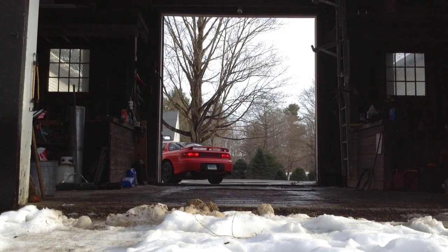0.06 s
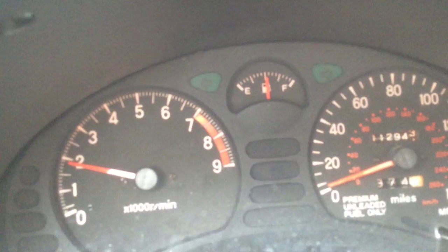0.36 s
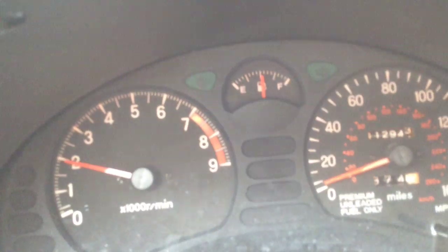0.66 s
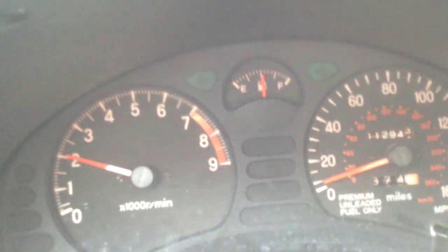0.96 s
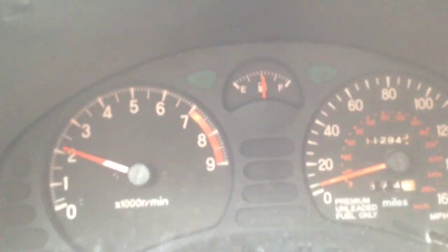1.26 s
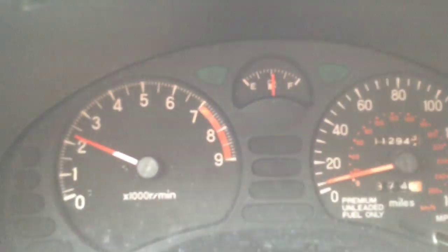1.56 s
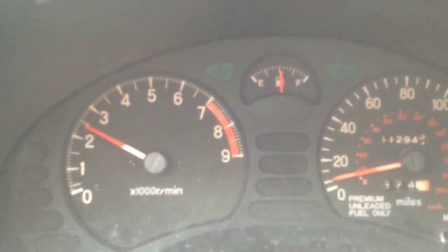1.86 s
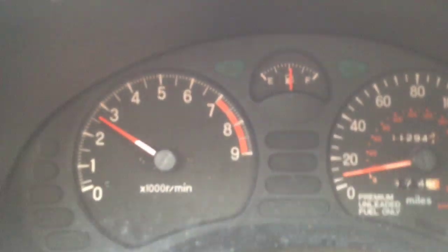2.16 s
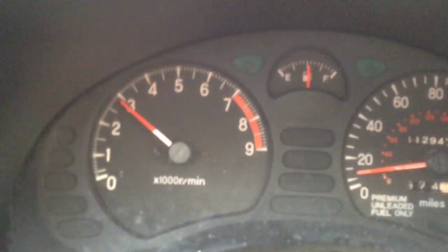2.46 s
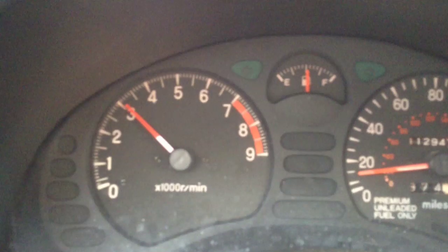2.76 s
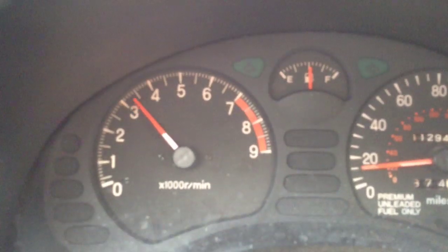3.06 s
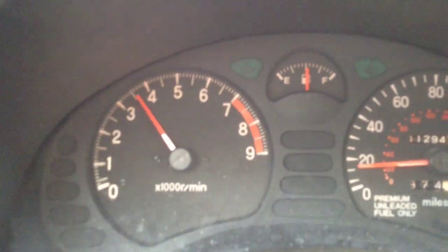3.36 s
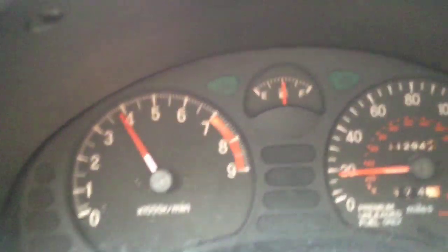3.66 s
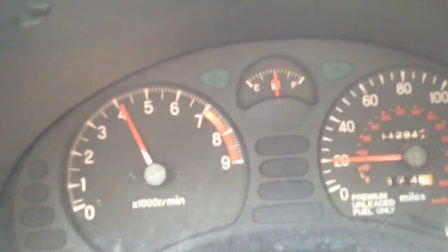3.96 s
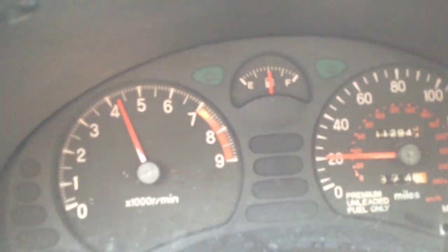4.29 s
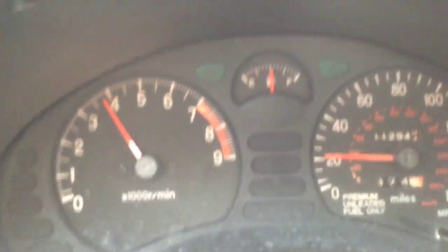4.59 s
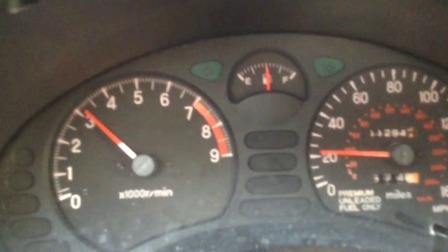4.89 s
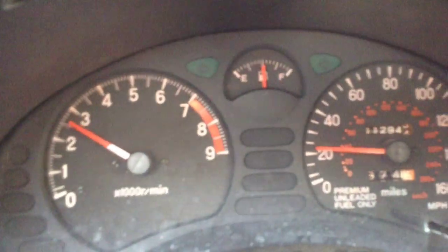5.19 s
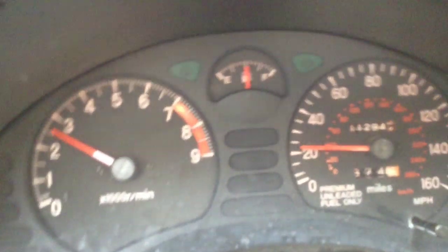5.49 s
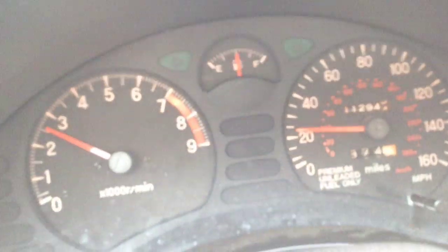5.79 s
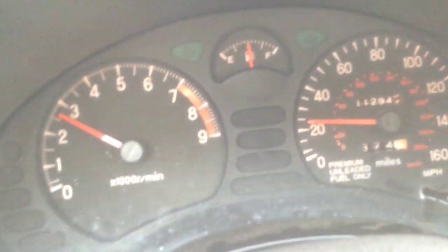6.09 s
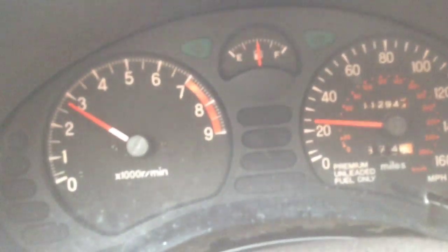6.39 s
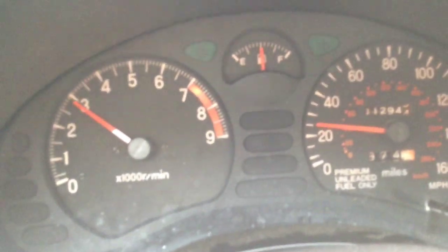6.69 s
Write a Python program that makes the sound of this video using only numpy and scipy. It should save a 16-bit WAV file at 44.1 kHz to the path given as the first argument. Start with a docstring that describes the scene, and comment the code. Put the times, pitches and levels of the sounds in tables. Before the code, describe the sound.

A sports car idles outdoors for a moment with a brief, very high brake squeal. Two clicks switch the sound to the driver's seat, where the engine accelerates steadily, its deep exhaust booming in the cabin over growing road noise. Loose plastic trim ticks and knocks now and then. The engine falls back, burbling, for a gear change, then pulls again with a slowly rising pitch.

```python
"""First a V6 sports car idles outside a barn, over the hiss of a wet yard, and a brake squeals briefly. After a
third of a second the sound jumps, with two clicks, to the driver's seat. The engine pulls from about 2000 to
over 4000 rpm: the exhaust booms in the cabin, gas and road noise rise with it, and loose trim scuffs, ticks and
knocks. At 4.2 s the foot lifts for a gear change and the engine falls back, burbling. The gear lever clunks,
and at 5.4 s second gear bites and it pulls again."""
import sys
import numpy as np
from scipy import signal
from scipy.fft import rfft, irfft, next_fast_len
from scipy.io import wavfile
from scipy.ndimage import uniform_filter1d

SR = 44100
rng = np.random.default_rng(int(sys.argv[2]) if len(sys.argv) > 2 else 0)


def log_audio(samples):
    """Write samples as a 16-bit WAV file to the path given in sys.argv[1]."""
    # one column per channel
    frames = np.atleast_2d(samples).T
    # limit to full scale, then quantise
    limited = np.clip(frames, -1, 1)
    pcm = np.round(limited * 32767).astype(np.int16)
    wavfile.write(sys.argv[1], SR, pcm)


N = 301644
TIME = np.arange(N) / SR
MID_SPEED_HZ = 70

# Engine speed, as how often one bank (a row of three cylinders) fires: t/s, f/Hz
ENGINE_SPEED = [(0.36, 48.7), (0.41, 48.81), (1.09, 53.5), (1.61, 58.2), (2.53, 74.22), (3.47, 93.34),
                (4.05, 106.3), (4.19, 109.0), (4.26, 107.3), (4.35, 101.6), (4.51, 94.1), (4.71, 82.1),
                (4.91, 73.2), (5.18, 59.9), (5.34, 63.6), (5.43, 61.7), (5.57, 63.2), (5.7, 62.95),
                (6.54, 71.4), (6.79, 73.9)]
# The throttle, as the strength of the exhaust pulses: t/s, level/dB
PULSE_STRENGTH = [(.34, -6.5), (.58, -1), (4.2, 0.5), (4.3, -10.5), (4.6, -7.5), (5.08, -8.5), (5.2, -13.5),
                  (5.33, -19), (5.52, 2), (6.84, -2)]
# A faster engine is louder: bank f/Hz, growl level/dB, gas rush level/dB, hiss level/dB
LEVELS_BY_SPEED = [(48.3, -35.5, -48.5, -74), (57.2, -32, -45, -74.5), (65.8, -27, -42, -67.5),
                   (80.6, -24.5, -41.5, -68), (88.8, -25, -40.5, -64.5), (96.8, -24, -36, -58.5),
                   (109, -25.5, -35.5, -54)]
def driving(lift_s=4.2, second_gear_s=5.4, pedal_s=.11, clutch_s=.51, burble=.22, jitter=.00053):
    """Speed, throttle and gear set how loud the exhaust, gas and road are inside the car."""
    bank_hz = uniform_filter1d(in_time(ENGINE_SPEED)[0], SR // 16)   # the flywheel smooths the speed
    throttle_db, = in_time(PULSE_STRENGTH)
    foot_up = ramp(lift_s, pedal_s)
    lift = foot_up - ramp(second_gear_s, pedal_s)
    stumble = burble * (foot_up - ramp(second_gear_s, clutch_s))   # firing steadies as the clutch grips
    labour = ramp(second_gear_s, 1.4)   # the engine works harder and harder
    rolling = ramp(lift_s, 1.1)   # the car rolls on while the engine slows, so the noise stays up
    bank_turns = np.cumsum(bank_hz * (1 + jitter * drift(9.5))) / SR
    speeds, *levels = np.transpose(LEVELS_BY_SPEED)
    surge_db = .5 * drift(6.3)
    growl_db, rush_db, hiss_db = [surge_db + np.interp(bank_hz, speeds, db) for db in levels]
    load_db = growl_db + .18 * throttle_db
    rasp = from_db(load_db + 1.3 * labour - lift) * growl(bank_turns, bank_hz, stumble)
    exhaust = boom(bank_turns, bank_hz, throttle_db, lift, labour, stumble) + rasp
    rumble = road_rumble(load_db - 6.5 + 3 * lift)   # off the throttle, rasp gives way to rumble
    rush = gas_rush(rush_db + .068 * throttle_db + 2 * rolling)
    hiss = high_hiss(hiss_db + 8.5 * rolling)
    puffs = 1 + .14 * np.cos(2 * np.pi * bank_turns)   # one puff each time the bank fires
    return exhaust + hiss + puffs * (rumble + rush + sizzle(bank_hz, throttle_db))


# How strongly pipe and cabin boom at each low pitch: f/Hz, level/dB
BOOM_STRENGTH = [(55, -67), (66, -41.5), (100, -36), (122, -20.5), (133, -10), (155, -8), (188, -6.5),
                 (205, -11.5), (216, -9.5), (235, -6), (252, -6.5), (272, -15), (288, -13.5), (312, -16),
                 (328, -25.5), (346, -19.5), (376, -36), (430, -28)]
# Tones at 1 to 4 times the bank rate: level/dB, then the extra level/dB
# for each doubling of speed, with the foot lifted, and when the engine works hard
BOOM_TONES = [(6, 1.5, 11, 5), (0, 0.5, -0.5, 2.5), (-7.5, -5, 6.5, -9), (-3.5, 15.5, -2, 1.5)]
def boom(bank_turns, bank_hz, throttle_db, lift, labour, stumble, flutter=.09, upper_flutter=.13):
    """Four deep exhaust tones glide with the engine; the second is the firing rate of all six cylinders."""
    out, octaves = 0, np.log2(bank_hz / MID_SPEED_HZ)
    for k, (db, speed_db, lift_db, labour_db) in enumerate(BOOM_TONES, 1):
        drive_db = throttle_db + speed_db * octaves + lift_db * lift + labour_db * labour
        level_db = db + drive_db + at_hz(BOOM_STRENGTH, k * bank_hz)
        waver = 1 + (flutter + stumble) * drift(19) + upper_flutter * (k > 2) * drift(5.3)
        out += from_db(level_db) * waver * np.sin(2 * np.pi * k * bank_turns)
    return np.sqrt(2) * out


# Which pitches the exhaust pipe favours: f/Hz, relative level/dB
PIPE_COLOUR = [(60, -26), (105, -1.5), (160, 13.5), (260, 13.5), (320, 7.5), (370, 0), (440, -0.5),
               (520, -6), (610, -11), (680, 0), (745, -2), (830, -13.5), (970, -12), (1170, -21),
               (1500, -27.5), (2600, -34)]
# Unequal pipe lengths lift some tones and weaken others: {vibrations per engine cycle: level/dB}
PIPE_ACCENTS = {13: 2.4, 18: 2.3, 24: 0.92, 27: 0.94, 29: 3, 30: 1.7, 33: -0.62, 36: -5.5, 41: 8.6, 45: -1}
def growl(bank_turns, bank_hz, stumble, uneven_db=-8, rough=.24, bite_db=3, cylinders=3):
    """Unequal cylinders add weak tones between the bank's own; all glide through pipe and cabin peaks."""
    out, power = np.zeros(N), np.zeros(N)
    grid_hz = np.arange(SR // 10)
    response = from_db(at_hz(PIPE_COLOUR, grid_hz) + cabin_db(grid_hz))
    bite = from_db(bite_db * np.log2(bank_hz / np.mean(bank_hz))) - 1   # faster pulses are sharper
    cycle, tone = np.exp(2j * np.pi * bank_turns / cylinders), np.ones(N, complex)
    depth = rough + 2.2 * stumble
    wobbles = [(1 + depth * (drift(9.2) + 1j * drift(27))) / np.sqrt(1 + 2 * depth ** 2)
               for _ in range(10)]
    for k in range(1, 84):
        tone = tone * cycle   # k vibrations per engine cycle
        on_bank = k % cylinders == 0
        if k < cylinders or (on_bank and k <= 4 * cylinders):
            continue   # leave the deepest tones to the boom
        hz = bank_hz * k / cylinders
        gain = np.interp(hz, grid_hz, response)
        gain *= from_db(PIPE_ACCENTS.get(k, 0) + (0 if on_bank else uneven_db))
        gain *= 1 + bite * np.clip((hz - 500) / 200, 0, 1)
        out += gain * (tone * wobbles[k % 10] * np.exp(2j * np.pi * rng.random())).real
        power += gain ** 2 / 2 * np.clip((hz - 360) / 60, 0, 1)
    return out / np.sqrt(uniform_filter1d(power, SR // 2))   # evens out slow swells above the boom


# The rumble's tone colour: f/Hz, relative level/dB
RUMBLE_COLOUR = [(20, -20), (50, -18.5), (90, -10.5), (180, -0.5), (290, -3.5), (440, -8.5), (600, -15.5),
                 (720, -17), (850, -16.5), (1000, -23.5), (1400, -28), (2500, -53.5)]
def road_rumble(db):
    """The road and the swirling exhaust make a low noise."""
    return from_db(db) * noise(RUMBLE_COLOUR, inside=True)


# The rush's tone colour: f/Hz, relative level/dB
RUSH_COLOUR = [(590, -31.5), (1000, -3.5), (1250, -11), (1500, -8), (1690, -13), (2920, -23), (3370, -25.5),
               (5260, -33.5), (6500, -41), (8450, -73.5), (14300, -120)]
def gas_rush(db):
    """Flowing gas makes a breathy noise."""
    return from_db(db) * noise(RUSH_COLOUR, inside=True)


# The hiss's tone colour: f/Hz, relative level/dB
HISS_COLOUR = [(3240, -31.5), (5500, 0), (6570, -4), (7650, -1), (8860, -1.5), (10400, -7.5),
               (11300, -16.5), (14500, -17.5), (15500, -19.5)]
def high_hiss(db):
    """A thin hiss lies above the rush."""
    return from_db(db) * noise(HISS_COLOUR, inside=True)


def sizzle(bank_hz, throttle_db, shake_hz=94.5, width_hz=4, flicker_db=4):
    """A small loose part buzzes, most when the engine passes the speed that shakes it."""
    shaken = 1 / (1 + ((bank_hz - shake_hz) / width_hz) ** 4)
    db = -72.5 + 6 * np.log2(bank_hz / MID_SPEED_HZ) + 10 * shaken + .6 * throttle_db
    return from_db(db + flicker_db * drift(20)) * narrow_noise(8050, width_hz=1100)


# The plastic's tone colour: f/Hz, relative level/dB
PLASTIC_COLOUR = [(1000, -3.5), (3000, 3), (5500, -1.5), (9000, -2), (12000, -8.5), (14800, -6),
                  (15800, -30)]
# Short ticks: t/s, level/dB
TRIM_TICKS = [(1.0844, -56), (1.2638, -53), (1.4591, -54.5), (2.0023, -30.5), (4.142, -38.5),
              (4.4055, -33.5), (4.43, -32), (4.4649, -50.5), (4.6475, -31.5), (4.862, -32)]
# Longer scuffs: t/s, level/dB before the lows are cut, rise t/s, lower edge f/Hz
TRIM_SCUFFS = [(1.911, -29, .016, 1000), (3.598, -51, .006, 4000), (4.357, -40, 0.0056, 4000),
               (4.586, -36.5, 0.0061, 2500), (5.085, -40, 0.059, 11000), (5.584, -46.5, 0.0072, 4000),
               (6.346, -49, 0.0081, 4000)]
def loose_trim(grain_db=2.5):
    """Loose plastic ticks, and scuffs in many tiny slips."""
    slips = noise(PLASTIC_COLOUR) * from_db(grain_db * drift(160))
    out = slips * sum(contact(s, db, rise=.0015, t60=.034) for s, db in TRIM_TICKS)
    for s, db, rise, edge_hz in TRIM_SCUFFS:
        bright = signal.sosfilt(signal.butter(2, edge_hz, "high", fs=SR, output="sos"), slips)
        out += contact(s, db, rise, t60=.15) * bright
    return out


def contact(s, db, rise, t60, rattle_db=-17):
    """How loud one touch on the trim is over time, as the panel rattles on after it."""
    rattle = from_db(rattle_db) * burst(s + rise, rise=.031, t60=.3)
    return from_db(db) * (burst(s, rise, t60) + rattle)


# Each ping: t/s, f/Hz, level/dB, fade t/s
PART_PINGS = [(0.667, 3780, -42.5, 0.071), (4.435, 6070, -34, 0.046), (4.497, 8070, -49, 0.062),
              (5.345, 3250, -41, 0.067), (5.346, 8190, -47.5, 0.11), (5.358, 3500, -47, .08)]
def pings():
    """Small hard parts ring briefly, each at its own pitch."""
    return sum(from_db(db) * burst(s, .002, t60) * narrow_noise(hz, width_hz=61)
               for s, hz, db, t60 in PART_PINGS)


# Each knock: t/s, level/dB
CABIN_KNOCKS = [(1.932, -20.5), (5.344, -42.5), (5.357, -24.5), (5.365, -32)]
# Their dull tone colour: f/Hz, relative level/dB
DULL_COLOUR = [(300, -15), (600, 3), (800, -4.5), (1100, 3), (1350, -7), (1550, -8), (2500, -17.5),
               (4800, -27.5), (6500, -43), (12000, -55)]
def knocks():
    """Knocks in the cabin, from loose trim and from the gear lever at the shift: a sudden start and a quick
    fade."""
    return noise(DULL_COLOUR) * sum(from_db(db) * burst(s, rise=.00032, t60=.11) for s, db in CABIN_KNOCKS)


# The hum of the exhaust from outside: f/Hz, relative level/dB
IDLE_TONES = [(123.8, -26), (188.4, -37.5), (220.7, -44), (290.7, -29.5), (360.7, -53), (414.5, -51),
              (576.0, -44.5), (629.8, -53)]
def idle(gain_db=-2, waver=.34):
    """The idling exhaust holds a few pitches, each wavering in loudness."""
    return sum(from_db(db + gain_db) * (1 + waver * drift(7.9))
               * np.sin(2 * np.pi * (hz * TIME + rng.random())) for hz, db in IDLE_TONES)


def brake_squeal(hz=12330, spread_hz=30, db=-34, flutter_db=4.5):
    """A brake disc sings one very high note that swells, holds and dies away."""
    disc_turns = np.cumsum(hz + spread_hz * drift(60)) / SR
    braking = burst(.151, rise=.018, t60=.36, hold=.06)
    return braking * from_db(db + flutter_db * drift(52)) * np.sin(2 * np.pi * disc_turns)


# The yard's tone colour: f/Hz, relative level/dB
YARD_COLOUR = [(25, -28), (70, -27), (120, -1.5), (290, 6.5), (420, -6), (600, -8.5), (900, -13.5),
               (2000, -22), (4500, -25.5), (8000, -30.5), (11000, -36), (15000, -38)]
def yard(db=-30.5):
    """The wet yard makes a steady background noise."""
    return from_db(db) * noise(YARD_COLOUR)


# Peaks and hollows at the driver's seat: f/Hz, width f/Hz, level/dB
CABIN_RESONANCES = [(300, 10, 4.5), (344.3, 12, 5), (432, 44, 4), (479.5, 25, 7), (531.8, 16, 9),
                    (651, 22, -7.5), (684, 18, 0), (711, 4.2, 5.5), (754, 28, -0.5), (820, 21, -4),
                    (949, 19, 6), (1000, 7.7, 4.5), (1113, 34, -4.5), (1160, 31, 5.5), (1840, 19, -0.5),
                    (2130, 33, 3.5), (2970, 99, 5), (4600, 110, 5.5), (5100, 270, 3.5), (6000, 1300, -7)]
def cabin_db(hz):
    """The cabin makes some pitches louder and others softer."""
    return sum(db / (1 + (2 * (hz - centre) / width) ** 2) for centre, width, db in CABIN_RESONANCES)


# Echoes off glass and dashboard: delay t/s, strength (a minus flips the wave)
CABIN_ECHOES = [(.0019, 0.074), (.0043, -.16), (.0071, .15), (0.0106, 0.15)]
def noise(colour, inside=False):
    """Steady noise of strength 1; inside the car, the cabin's peaks and echoes colour it too."""
    size = next_fast_len(N)
    hz = np.arange(size // 2 + 1) * SR / size
    gain = from_db(at_hz(colour, hz))
    if inside:
        echoes = sum(strength * np.exp(-2j * np.pi * hz * delay) for delay, strength in CABIN_ECHOES)
        gain = gain * from_db(cabin_db(hz)) * (1 + echoes)
    return rms_one(irfft(rfft(rng.standard_normal(size)) * gain, size)[:N])


def narrow_noise(hz, width_hz):
    """Something that rings near one pitch, shaken at random; strength 1."""
    r = np.exp(-np.pi * width_hz / SR)
    poles = [1, -2 * r * np.cos(2 * np.pi * hz / SR), r * r]
    return rms_one(signal.sosfilt([[1, 0, -1] + poles] * 2, rng.standard_normal(N)))


def drift(rate_hz, step=64):
    """A smooth random wander, about 1 in size; a higher rate wanders faster."""
    r = np.exp(-2 * np.pi * rate_hz * step / SR)
    slow = signal.lfilter([1], [1, -2 * r, r * r], rng.standard_normal(2 * N // step))[N // step - 2:]
    return np.interp(np.arange(N) / step, np.arange(len(slow)), rms_one(slow))


def burst(s, rise, t60, hold=0):
    """Climbs to 1 from time s, may hold, then fades by 60 dB in t60 seconds."""
    return ramp(s, rise) * from_db(-60 * np.clip((TIME - s - rise - hold) / t60, 0, 2))


def ramp(s, length):
    """Climbs from 0 to 1, starting at time s."""
    return np.clip((TIME - s) / length, 0, 1)


def in_time(rows):
    """Joins a table's points to give a value at every sample."""
    s, *columns = np.transpose(rows)
    return [np.interp(TIME, s, column) for column in columns]


def at_hz(points, hz):
    """Reads a table's level at any pitch, with octaves evenly spaced."""
    corners, db = np.transpose(points)
    return np.interp(np.log(hz + 1e-9), np.log(corners), db)


def from_db(db):
    return 10 ** (np.asarray(db) / 20)


def rms_one(x):
    return x / np.sqrt(np.mean(x ** 2) + 1e-20)


# Two clicks at the jump into the car: t/s, height
ENTRY_CLICKS = [(.335, 0.15), (0.3516, 0.2)]
def scene(inside_s=.335):
    """First the yard, then suddenly the driver's seat."""
    outside = idle() + brake_squeal() + yard()
    inside = driving() + loose_trim() + pings() + knocks()
    clicks = sum(height * burst(s, rise=2 / SR, t60=.023) for s, height in ENTRY_CLICKS)
    return (np.where(TIME < inside_s, outside, inside) + clicks)[None]


def record(dry):
    """Rounds off the tallest peaks and cuts the treble above 15800 Hz."""
    rounded = dry / (1 + (dry / 1.1) ** 12) ** (1 / 12)
    return signal.sosfilt(signal.ellip(10, .1, 80, 15800, fs=SR, output="sos"), rounded)


dry = scene()
out = record(dry)
log_audio(out)
```